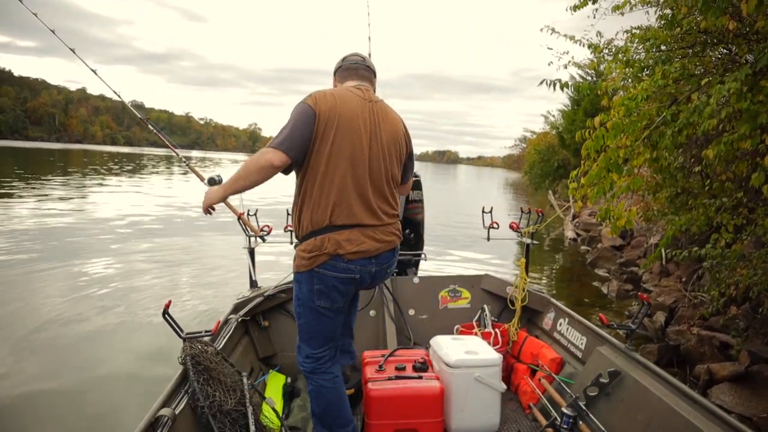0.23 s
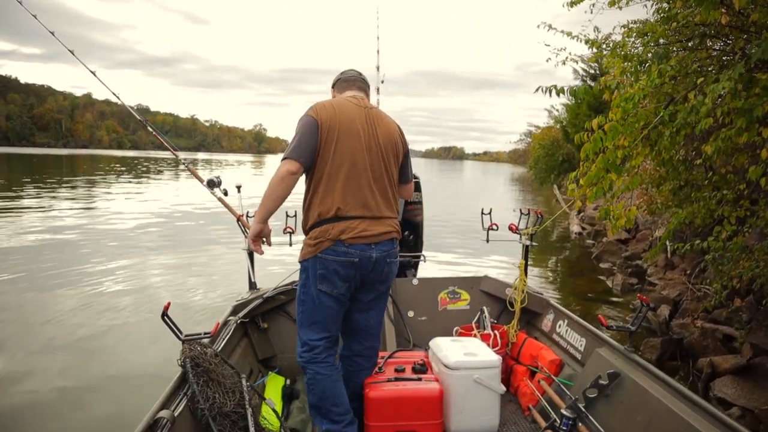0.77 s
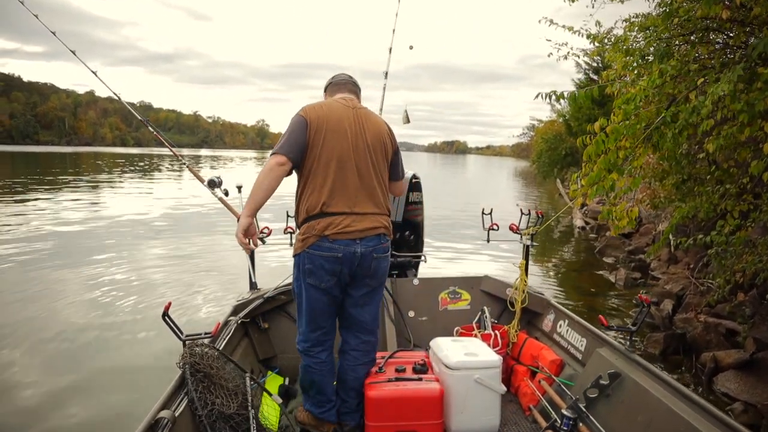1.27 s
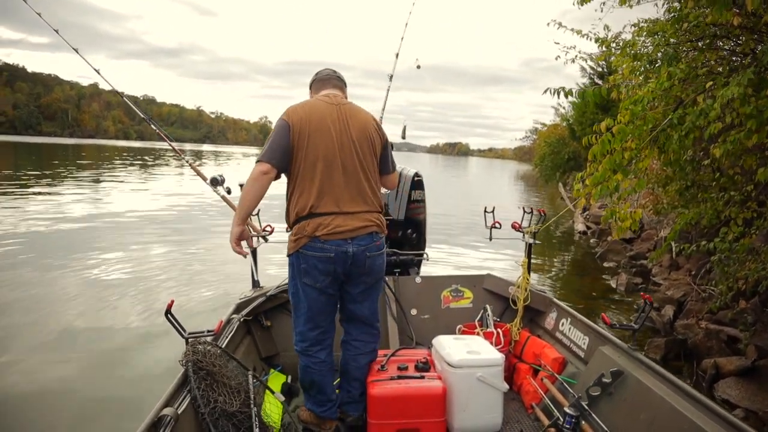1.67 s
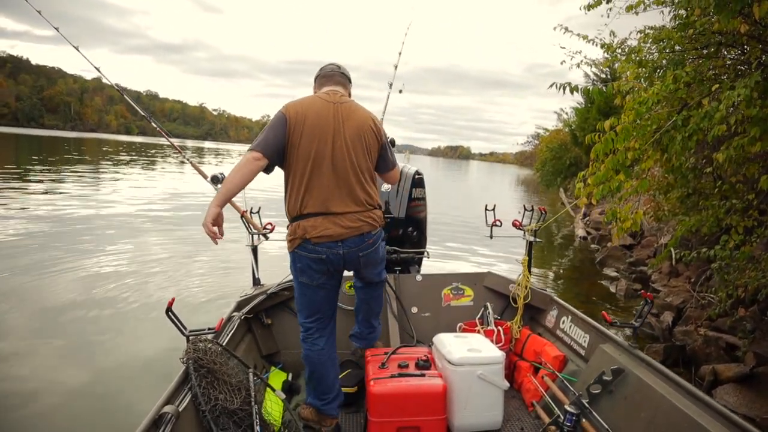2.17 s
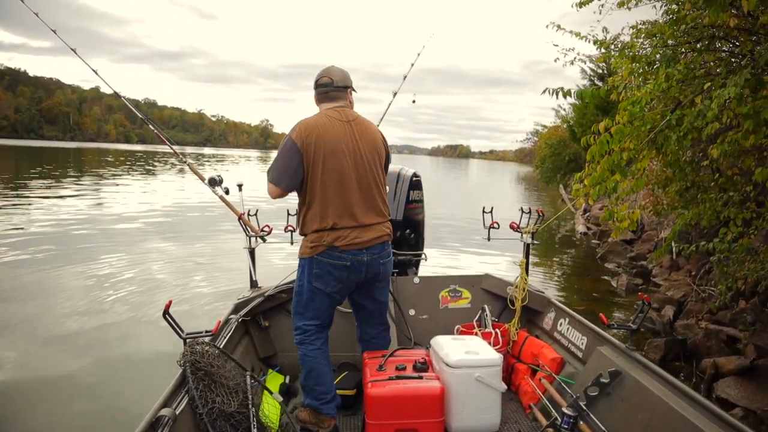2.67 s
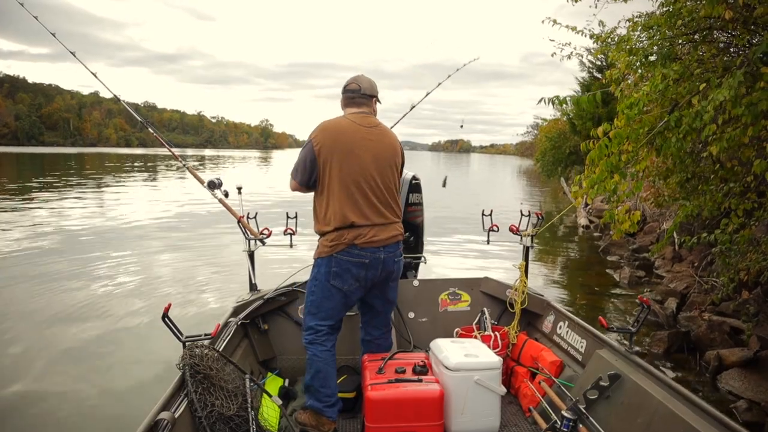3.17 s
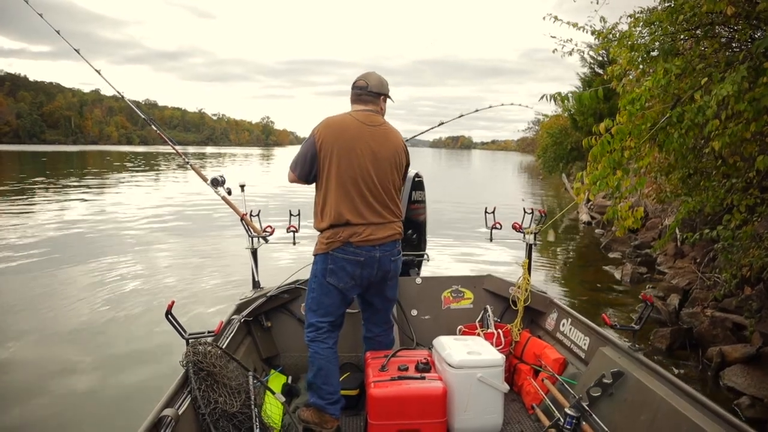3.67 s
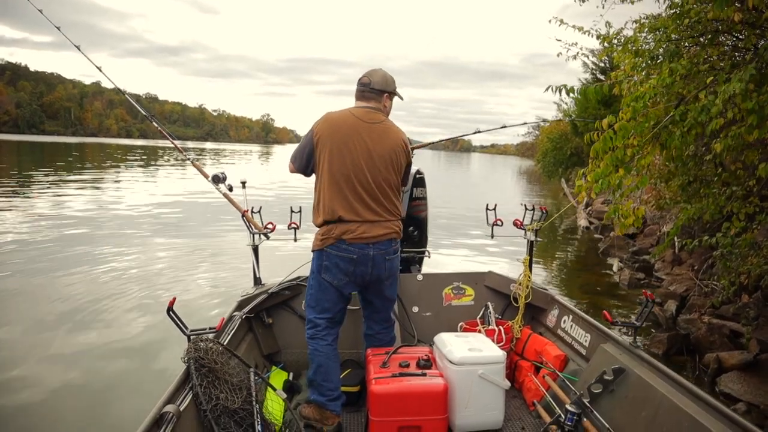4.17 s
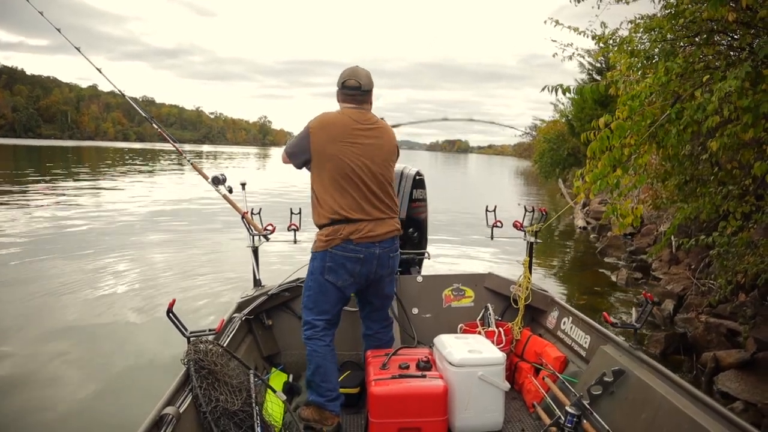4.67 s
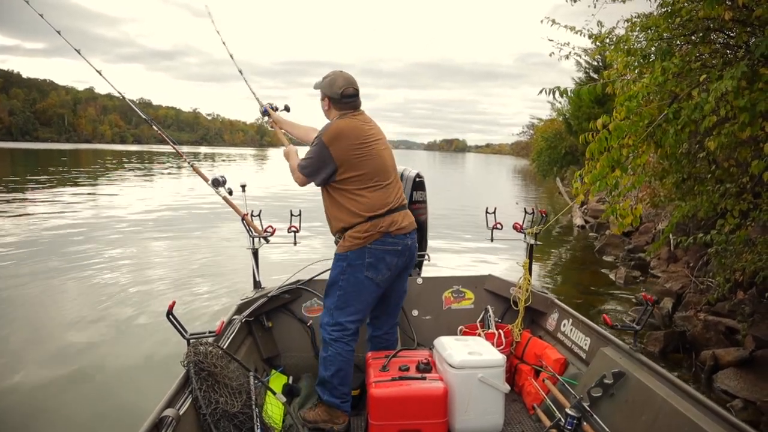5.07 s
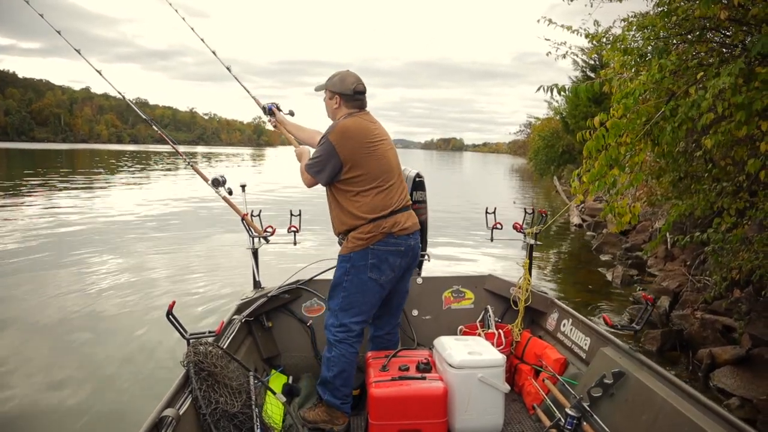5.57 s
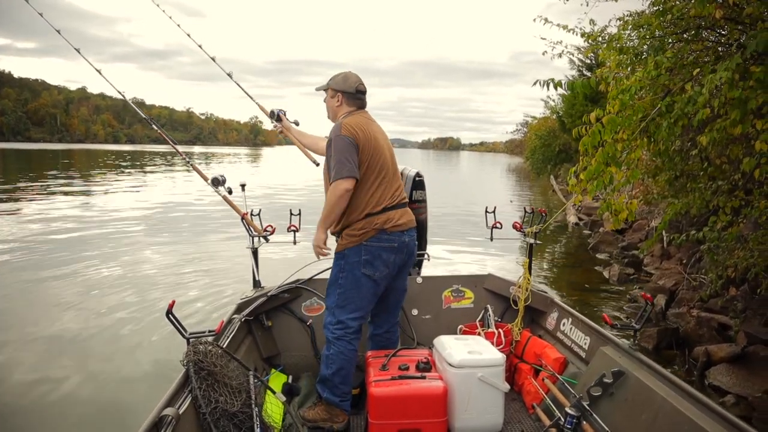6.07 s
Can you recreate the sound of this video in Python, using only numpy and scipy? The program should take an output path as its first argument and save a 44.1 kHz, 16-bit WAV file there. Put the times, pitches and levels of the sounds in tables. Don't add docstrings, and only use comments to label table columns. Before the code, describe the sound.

One microphone aboard a small metal boat hears an angler moving nearby: gritty soles, low hull booms, sharp clacks and a dominant bright bang. The movement eases, a hollow container bumps down twice, and tackle clatters. More than a second of quiet open-lake air follows. Light clicks from the rod then give way to a quick, throbbing hiss of running line that gradually weakens.

```python
import sys
import numpy as np
from scipy import signal
from scipy.fft import rfft, irfft, next_fast_len
from scipy.io import wavfile
from scipy.ndimage import uniform_filter1d

SR = 44100
rng = np.random.default_rng(int(sys.argv[2]) if len(sys.argv) > 2 else 0)


def invert_db(x):
    u = np.asarray(x, float) / 20
    return 10 ** u


def persist_wave(psi):
    counts = np.round(np.clip(psi, -1, 1) * 32767).astype(np.int16)
    wavfile.write(sys.argv[1], SR, np.atleast_2d(counts).T)


N = 278712

# pitch_hz [Hz], level_db [dB], t60_s [s]
HULL_MODES = [(57.4, -10, 0.16), (69.3, -11, 0.26), (93, -3.5, 0.25), (117.6, -9, 0.11), (131.5, -1, 0.11),
              (161, -0.5, 0.17), (187.2, -7.5, 0.33), (229, -6.5, 0.25), (266, -2, 0.11), (308, 1.5, 0.083),
              (335.3, 4, 0.094), (373, -7, 0.049), (401, -3.5, 0.13), (464, 2.5, 0.084), (526, -3.5, 0.14),
              (570, -3, 0.14), (658, -3.5, 0.11), (745.5, -6, 0.091), (854, 7.5, 0.077), (916, -9.5, 0.29),
              (1079, 7, 0.07), (1170, -4.5, 0.088), (1402, 1.5, 0.056), (1528, -7, 0.2), (1813, -1, 0.076),
              (1907, 6.5, 0.022), (2280, 4.5, 0.028), (2710, -2.5, 0.038)]


def rms_one(x):
    return x / np.sqrt(np.mean(x ** 2) + 1e-20)


def colour(x, spectrum):
    size = next_fast_len(len(x))
    hz = np.maximum(np.fft.rfftfreq(size, 1 / SR), 1)
    point_hz, point_db = np.array(spectrum).T
    level_db = np.interp(np.log(hz), np.log(point_hz), point_db, left=-90)
    return rms_one(irfft(rfft(x, size) * invert_db(level_db), size)[:len(x)])


def drift(rate_hz):
    r = np.exp(-2 * np.pi * rate_hz / SR)
    slow = signal.lfilter([1], [1, -2 * r, r * r], rng.standard_normal(N + SR))
    return rms_one(slow[SR:])


def resonate(x, hz, width_hz):
    r = np.exp(-np.pi * width_hz / SR)
    gain = (1 - r * r) / 2
    return signal.lfilter([gain, 0, -gain], [1, -2 * r * np.cos(2 * np.pi * hz / SR), r * r], x)


def grains(per_s, spread_db):
    sizes = invert_db(spread_db * np.minimum(rng.exponential(1, N), 5)) * rng.choice([-1, 1], N)
    return sizes * (rng.random(N) < per_s / SR)


def swells(starts, lengths, levels_db, rise_db_s, fall_db_s):
    t = np.arange(0, N + 64, 64) / SR
    s, length, db = (np.asarray(v, float)[:, None] for v in (starts, lengths, levels_db))
    before_s = np.maximum(s - t, 0)
    after_s = np.maximum(t - s - length, 0)
    each = db - rise_db_s * before_s - fall_db_s * after_s
    return np.interp(np.arange(N) / SR, t, each.max(axis=0))


def air():
    # pitch_hz [Hz], level_db [dB per Hz]
    far_spectrum = [(13, -51), (22, -23.5), (41, -8), (97, -4.5), (135, -6), (168, -4), (254, -7),
                    (405, -9.5), (533, -10), (595, -9), (1030, -10), (1120, -13), (1360, -12.5),
                    (3090, -29.5), (15600, -35)]
    level_db = -61 + 0.12 * drift(4.4)
    return invert_db(level_db) * colour(rng.standard_normal(N), far_spectrum)


def moving():
    # start_s [s], length_s [s], scuff_db [dB], rumble_db [dB]
    drags = [(0.0, 0.17, -62.5, -54.5), (0.213, 0.066, -62, -57.5), (0.613, 0.024, -61, -46.5),
             (0.831, 0.12, -66, -58), (1.03, 0.069, -74, -43), (1.111, 0.013, -48.5, -63),
             (1.201, 0.15, -57, -44), (1.44, 0.23, -74, -62), (1.8, 0.18, -66.5, -59),
             (1.945, 0.15, -64, -63), (2.497, 0.056, -70, -56), (2.585, 0.089, -63.5, -59),
             (2.637, 0.065, -60, -52), (2.748, 0.067, -58.5, -44), (2.83, 0.086, -64.5, -61),
             (2.95, 0.1, -66.5, -62), (3.106, 0.16, -77, -66.5), (4.462, 0.26, -76.5, -74),
             (4.753, 0.07, -72, -66.5), (4.956, 0.03, -60.5, -56), (4.999, 0.034, -54.5, -52.5),
             (5.05, 0.12, -63, -65)]
    # start_s [s], heave_db [dB], sway_db [dB]
    loads = [(0.02, -64, -64), (0.4, -88, -64), (0.64, -70, -56), (0.74, -44.5, -52), (0.86, -58, -50.5),
             (1.02, -45, -65), (1.15, -45.5, -50), (1.36, -57, -57), (1.52, -66, -54), (2.69, -62, -55),
             (2.77, -41.5, -70), (2.88, -48, -47), (3.05, -63, -52.5), (3.27, -65, -58.5), (4.76, -63, -80),
             (5.0, -71, -84)]
    # pitch_hz [Hz], level_db [dB per Hz]
    scuff_spectrum = [(530, -19), (900, -5.5), (1590, -9), (1880, -9.5), (2390, -10), (4130, -14.5),
                      (6650, -18.5), (8550, -16.5), (10300, -28), (15500, -32.5)]
    rumble_spectrum = [(90, 1), (150, 2), (300, 1.5), (550, -3), (1100, -12.5), (2000, -22.5), (4000, -77)]
    heave_spectrum = [(35, -12), (55, 2.5), (75, -18), (110, -0.5), (200, -27), (400, -87)]
    sway_hz, sway_width_hz = 27, 17

    s, length, scuff_db, rumble_db = np.transpose(drags)
    scuff_db = swells(s, length, scuff_db, rise_db_s=214, fall_db_s=175)
    rumble_db = swells(s, length, rumble_db, rise_db_s=415, fall_db_s=109.5)
    s, heave_db, sway_db = np.transpose(loads)
    heave_db = swells(s, 0 * s, heave_db, rise_db_s=171, fall_db_s=116)
    sway_db = swells(s, 0 * s, sway_db, rise_db_s=171, fall_db_s=120)

    rub = rng.standard_normal(N) * invert_db(2.16 * drift(20)) + 0.43 * grains(403, spread_db=-7.0)
    scuff = invert_db(scuff_db + 1.5) * colour(rub, scuff_spectrum)
    uneven = rng.standard_normal(N) * invert_db(3.0 * drift(18))
    rumble = invert_db(rumble_db) * colour(uneven, rumble_spectrum)
    heave = invert_db(heave_db) * colour(rng.standard_normal(N), heave_spectrum)

    swing = resonate(rng.standard_normal(N), sway_hz, sway_width_hz)
    swing = resonate(swing, sway_hz, sway_width_hz)
    steady = swing / np.sqrt(uniform_filter1d(swing ** 2, SR // 13) + 1e-14)
    sway = invert_db(uniform_filter1d(sway_db, SR // 15)) * steady
    return scuff + rumble + heave + sway


def taps():
    # start_s [s], peak_db [dB], pitch_hz [Hz], t60_s [s]
    ticking_parts = [(0.285, -52, 3000, 0.052), (0.4187, -61, 7350, 0.082), (0.52, -57.5, 8000, 0.2),
                     (0.5784, -47.5, 2620, 0.026), (0.6823, -59, 7500, 0.04), (0.82, -61, 7000, 0.029),
                     (0.8639, -61, 3450, 0.028), (0.997, -47, 2200, 0.036), (1.002, -32, 1300, 0.05),
                     (1.209, -48, 4000, 0.03), (1.2326, -50, 3000, 0.03), (1.797, -58, 2500, 0.04),
                     (1.86, -58, 2500, 0.04), (2.2039, -60, 2400, 0.04), (2.245, -62, 8000, 0.043),
                     (2.4293, -58, 4500, 0.04), (2.4867, -63, 8500, 0.06), (2.7068, -38, 1980, 0.024),
                     (2.72, -32.5, 2520, 0.03), (2.731, -53, 2800, 0.035), (2.742, -43, 1890, 0.021),
                     (2.755, -40, 1500, 0.06), (2.777, -37, 1380, 0.056), (2.823, -47, 2500, 0.02),
                     (2.8298, -34.5, 4200, 0.043), (2.875, -48, 2400, 0.04), (2.89, -50, 3000, 0.054),
                     (2.912, -46.5, 1500, 0.037), (3.003, -64, 8500, 0.02), (3.013, -59, 2470, 0.04),
                     (3.046, -70, 3970, 0.04), (3.1258, -66, 5000, 0.03), (3.19, -64, 2500, 0.03),
                     (3.213, -53, 1500, 0.032), (3.3114, -66, 2700, 0.03), (4.4762, -61, 7800, 0.08),
                     (4.56, -64, 3130, 0.27), (4.668, -67, 7500, 0.03), (4.818, -68, 7500, 0.03),
                     (4.982, -52, 2800, 0.03), (4.988, -42, 1190, 0.05), (5.009, -43.5, 4200, 0.04),
                     (5.029, -52, 3000, 0.03), (5.384, -42, 7400, 0.04), (5.386, -44, 3070, 0.04),
                     (4.767, -53, 1700, 0.027), (0.616, -48, 4300, 0.036), (2.835, -44.5, 4430, 0.05),
                     (2.8307, -35.5, 2300, 0.067), (5.053, -51, 1000, 0.028), (2.721, -47, 13500, 0.055),
                     (2.832, -60, 12500, 0.04), (4.69, -58, 524, 0.14), (4.727, -51, 460, 0.21),
                     (4.785, -49, 490, 0.078)]
    t, out = np.arange(SR // 6) / SR, np.zeros(N)
    for s, db, hz, t60 in ticking_parts:
        width_hz = 0.32 * hz
        envelope = (1 - np.exp(-t / 0.00012)) * invert_db(-60 * t / np.clip(t60, .01, .3))
        burst = rng.standard_normal(len(t)) * envelope
        burst = resonate(resonate(burst, hz, width_hz), hz, 2 * width_hz)
        at = round(s * SR)
        out[at:at + len(t)] += invert_db(db) * burst / np.abs(burst).max()
    return out


def cracks():
    # start_s [s], crack_db [dB], top_db [dB], t60_s [s]
    crushed = [(0.0735, -43.5, -73, 0.034), (0.298, -45, -53, 0.036), (0.494, -46, -61, 0.15),
               (0.595, -39.5, -76, 0.16), (0.634, -40, -71, 0.028), (0.941, -46, -63, 0.091),
               (0.9637, -34.5, -45, 0.15), (0.9834, -24, -31.5, 0.049), (0.991, -32, -55, 0.058),
               (1.081, -48, -41.5, 0.11), (1.1184, -32, -41, 0.035), (1.147, -20.5, -30, 0.075),
               (1.149, -38, -32.5, 0.068), (1.284, -44, -49, 0.14), (1.309, -41, -49.5, 0.092),
               (1.845, -66, -55.5, 0.11), (2.031, -44.5, -50.5, 0.053), (2.511, -51.5, -72, 0.062),
               (2.683, -49, -70, 0.032), (2.7083, -32, -44, 0.061), (2.725, -48, -41.5, 0.047),
               (2.773, -41, -68, 0.052), (2.829, -39, -41, 0.032), (2.836, -41, -47, 0.1),
               (2.874, -51, -74, 0.11), ]
    # start_s [s], crack_db [dB], top_db [dB]
    snaps = [(0.777, -49, -56), (0.8063, -49.5, -67), (1.4933, -56.5, -62), (2.434, -53.5, -60),
             (2.9377, -46, -47.5), (3.156, -52.5, -65), (3.2594, -63, -66), (4.475, -63, -66),
             (4.7676, -58, -73), (4.92, -42, -65), (4.9402, -43, -57), (5.0052, -46, -62),
             (5.1482, -51, -46.5), (5.2498, -44.5, -47), (5.363, -49, -58), (5.3858, -48, -53)]
    # pitch_hz [Hz], level_db [dB per Hz]
    grit_spectrum = [(1180, 11.5), (2000, 1), (3770, -1.5), (4590, -9), (6140, -13), (8960, -23.5),
                     (11200, -34.5), (15500, -37)]
    snap_t60_s = 0.055

    rough = rng.standard_normal(N + SR) * invert_db(2.3 * rng.standard_normal(N + SR))
    grit = colour(rough, grit_spectrum)
    dull, top = [signal.sosfilt(signal.butter(3, 6000, kind, fs=SR, output="sos"), grit)
                 for kind in ("low", "high")]
    top = 0.77 * top + resonate(top, 8900, 1450)
    t, out = np.arange(SR // 6) / SR, np.zeros(N + SR)
    for s, crack_db, top_db, t60 in crushed + [(*row, snap_t60_s) for row in snaps]:
        at, t60 = round(s * SR), np.clip(t60, .015, .3)
        envelope = (1 - np.exp(-t / (0.013 * t60))) * invert_db(-60 * t / t60)
        for part, db in ((dull, crack_db - 1.5), (top, top_db)):
            burst = envelope * part[at:at + len(t)]
            out[at:at + len(t)] += invert_db(db) * burst / np.abs(burst).max()
    return out[:N]


def tank():
    # start_s [s], peak_db [dB], pitch_scale [ratio]
    setdowns = [
        (2.417, -25, 1.0),
        (2.5098, -27.5, 1.04),
    ]
    # pitch_hz [Hz], level_db [dB], t60_s [s]
    tank_modes = [(108, -3.5, 0.16), (128, 0.5, 0.16), (169.8, -14, 0.51), (210.3, -9.5, 0.24),
                  (291.4, -9.5, 0.16), (401, -21.5, 0.18), (500, -19, 0.15), (561, -24, 0.23)]
    rise_s = 0.0035
    t, out = np.arange(SR // 3) / SR, np.zeros(N)
    hz, db, t60 = np.array(tank_modes).T[:, :, None]
    rise = 1 - np.exp(-(t / rise_s) ** 2)
    for s, peak_db, scale in setdowns:
        ringing = invert_db(db - 60 * t / t60) * np.sin(2 * np.pi * hz * scale * t)
        thump = -ringing.sum(axis=0) * rise
        at = round(s * SR)
        out[at:at + len(t)] += invert_db(peak_db) * thump / np.abs(thump).max()
    return out


def bows():
    # start_s [s], peak_db [dB], from_hz [Hz], to_hz [Hz], t60_s [s]
    bowing_plates = [(0.598, -19, 157, 65, 0.08), (0.94, -25, 170, 70, 0.25), (2.5, -26, 160, 71, 0.14),
                     (2.763, -25.5, 114, 95, 0.17), (1.1475, -10.5, 1002, 1130, 0.061),
                     (1.146, -19, 1930, 1970, 0.04), (0.604, -28, 78, 63, 0.25),
                     (1.157, -11.5, 494, 510, 0.078), (1.203, -28.5, 440, 460, 0.054),
                     (2.784, -23.5, 396, 430, 0.041), (0.597, -40.5, 790, 760, 0.17),
                     (0.6, -41, 730, 675, 0.21), (0.77, -39, 74, 64, 0.23), (0.73, -38, 91, 68, 0.34),
                     (1.02, -27.5, 125, 69, 0.12), (1.17, -31.5, 130, 92, 0.16),
                     (0.55, -40, 185, 160, 0.11), (0.986, -27.5, 750, 990, 0.046),
                     (1.174, -26, 510, 460, 0.048), (2.145, -63, 230, 220, 0.18),
                     (2.275, -57, 215, 215, 0.17), (2.32, -51.5, 215, 220, 0.13),
                     (2.35, -56, 170, 131, 0.18)]
    sink_s, rise_s = 0.019, 0.0016
    t, out = np.arange(SR // 2) / SR, np.zeros(N)
    for s, db, from_hz, to_hz, t60 in bowing_plates:
        cycles = to_hz * t + (from_hz - to_hz) * sink_s * (1 - np.exp(-t / sink_s))
        note = np.sin(2 * np.pi * cycles) * (1 - np.exp(-t / rise_s)) * invert_db(db - 60 * t / t60)
        at = round(s * SR)
        out[at:at + len(t)] += note
    return out


def strike(s, peak_db, centre_hz, share, chance, low_hz, high_hz, lead_db, onset, slope_db, scatter, stretch):
    hz, mode_db, t60 = np.array([m for m in HULL_MODES if low_hz <= m[0] < high_hz]).T[:, :, None]
    nearest = np.argmin(np.abs(hz - centre_hz))
    hz[nearest] = centre_hz
    strength, phase = chance[:, :len(hz), None]
    t = np.arange(int(min(1.2 * t60.max() + 0.069, .45) * SR)) / SR
    near_db = -slope_db * np.abs(np.log2(hz / centre_hz)) - lead_db * (hz != centre_hz)
    rise = 1 - np.exp(-t * hz * onset)
    struck_panel = invert_db(-60 * t / (t60 * np.clip(share, .15, 2)))
    whole_hull = invert_db(-27.5 - 60 * t / (3.3 * t60))
    bent = t + stretch * 0.014 * (1 - np.exp(-t / 0.018))
    waves = np.sin(2 * np.pi * hz * bent + scatter * phase)
    level = invert_db(mode_db + near_db + 2.0 * strength)
    blow = (level * rise * (struck_panel + whole_hull) * waves).sum(axis=0)
    fade_out = np.minimum(1, 8 * (1 - t / t[-1]))
    return round(s * SR), invert_db(peak_db) * blow / np.abs(blow).max() * fade_out


def knocks():
    # start_s [s], peak_db [dB], panel_hz [Hz], ring_share [of the free decay]
    heel_booms = [(0.494, -44.5, 155, 0.3), (0.649, -30.5, 240.7, 0.48), (0.617, -24, 174.3, 0.5),
                  (0.676, -32, 149, 0.41), (0.703, -48, 69, 0.74), (0.757, -44, 75, 0.69),
                  (0.966, -21, 145.8, 0.54), (0.994, -22, 171, 0.26), (1.011, -28, 104.5, 0.38),
                  (1.03, -33, 110, 0.34), (1.074, -29, 138, 0.51), (1.15, -26.5, 167, 0.5),
                  (1.236, -43, 191.4, 1.7), (2.079, -45, 141, 0.66), (0.705, -40.5, 232, 1.9),
                  (0.925, -42, 65.6, 0.28), (2.621, -46.5, 128, 1.2), (2.728, -30, 91, 0.45),
                  (2.802, -34, 109, 0.38), (2.828, -33.5, 83, 0.76), (2.874, -37.5, 71.6, 0.37),
                  (2.93, -43.5, 72, 1.3), (4.949, -44.5, 114, 0.74), (5.011, -47, 74.4, 1.1), ]
    boot_knocks = [(0.28, -45.5, 334, 1), (0.302, -45, 393, 0.58), (0.494, -29, 442, 0.41),
                   (0.596, -20.5, 295, 0.22), (0.617, -25.5, 250, 1), (0.612, -32.5, 451, 1),
                   (0.963, -23, 583, 0.17), (0.984, -30, 297, 0.6), (1.049, -34.5, 256, 0.78),
                   (1.115, -35, 360, 0.63), (1.1465, -10, 448, 0.28), (1.149, -13.5, 341, 0.28),
                   (1.204, -40, 465, 0.38), (1.156, -25, 500, 0.4), (1.352, -50, 470, 0.7),
                   (1.946, -40, 324, 0.2), (2.087, -43, 550, 0.45), (2.766, -41, 295, 0.59),
                   (2.794, -50, 343, 0.37), (1.186, -26, 466, 0.54), (2.708, -28.5, 347, 0.47),
                   (2.7155, -23.5, 433, 0.49), (2.754, -32, 484, 1), (2.79, -34.5, 396, 0.54),
                   (2.826, -34.5, 370, 0.43), ]
    edge_clacks = [(0.218, -43, 1180, 0.25), (0.28, -45, 956, 0.7), (0.302, -41, 780, 0.19),
                   (0.494, -40, 835, 0.14), (0.596, -30.5, 1045, 1.6), (0.599, -32, 1970, 0.32),
                   (0.94, -44, 1433, 1.2), (0.963, -22, 875, 0.16), (0.987, -24, 2130, 0.47),
                   (1.010, -31, 1517, 0.27), (1.072, -34.5, 857, 0.36), (1.1462, -12, 855, 0.55),
                   (1.352, -30.5, 953, 0.34), (1.946, -48.5, 1750, 0.54), (2.03, -54, 1180, 0.58),
                   (2.708, -26, 1355, 0.85), (2.712, -30.5, 2580, 1), (2.826, -43, 1370, 0.33),
                   (2.875, -62, 1350, 0.56), (2.895, -48, 1480, 0.16), (3.156, -51.5, 1251, 0.32)]
    # start_s [s], knock_db [dB], knock_hz [Hz], clack_db [dB], clack_hz [Hz]
    jolts = [(4.7, -49, 348, -61, 840), (4.768, -52, 550, -50, 1345), (4.921, -40.5, 432, -39, 905),
             (4.941, -36, 450, -35, 904), (5.015, -37, 516, -56, 740), (5.069, -42, 370, -51, 815),
             (5.131, -46, 540, -44, 1000), (5.149, -48.5, 325, -48, 1170)]
    mode_ranges = [
        (50, 250, 5, 1.55, 7, 0.71, 0.18),
        (250, 840, 3, 1.16, 12.5, 1.39, 0.0085),
        (747.4, 3100, 5, 0.58, 1.5, 3.32, 0.0018),
    ]

    middle, high = list(boot_knocks), list(edge_clacks)
    for s, knock_db, knock_hz, clack_db, clack_hz in jolts:
        share = 0.33 - 0.025 * (clack_db + 40)
        middle.append((s, knock_db, knock_hz, share))
        high.append((s, clack_db, clack_hz, share))
    out = np.zeros(N + SR)
    for rows, modes in zip((heel_booms, middle, high), mode_ranges):
        for row in rows:
            chance = rng.standard_normal((2, len(HULL_MODES)))
            at, blow = strike(*row, chance, *modes)
            out[at:at + len(blow)] += blow
    return out[:N]


def spool():
    release_s, run_up_s = 5.122, 0.055
    thumb_s, grip_s = 6.06, 0.021
    ease_s, ease_over_s = 6.17, 0.016
    now = np.arange(N) / SR
    t = now - release_s
    run_up_db = 20 * np.log10(1e-4 + 1 - np.exp(-np.maximum(t, 0) / run_up_s))
    braked = np.clip((now - thumb_s) / grip_s, 0, 1)
    eased = np.clip((now - ease_s) / ease_over_s, 0, 1)
    hiss_db = -52.5 + run_up_db - 5 * t - 3.5 * braked + 3.5 * eased
    top_db = -71.5 + .5 * run_up_db + 2 * t - 7 * braked
    return hiss_db, top_db


def wander(x, hz, width_hz):
    centre_hz = hz * (1 + 0.007 * drift(3)[:len(x)])
    turn = np.exp(2j * np.pi * np.cumsum(centre_hz) / SR)
    r = np.exp(-np.pi * width_hz / SR)
    return 2 * np.real(turn * signal.lfilter([1 - r], [1, -r], x / turn))


def reel():
    # time_s [s], turns_per_s [1/s]
    spool_turns = [(5.12, 32), (5.4, 39), (5.6, 33), (5.9, 27), (6.05, 24), (6.32, 22)]
    # pitch_hz [Hz], width_hz [Hz], level_db [dB]
    body_modes = [(1170, 62, -0.5), (1500, 80, 3.5), (2460, 65, -33), (2950, 67, 7), (3220, 42, -5.5),
                  (4140, 70, 8), (4880, 55, 6.5), (5320, 170, 8.5), (5950, 50, 3), (6280, 90, 3),
                  (7330, 340, -3.5), (8100, 650, 0.5)]
    # pitch_hz [Hz], level_db [dB per Hz]
    line_spectrum = [(530, -11), (900, -1.5), (1160, -0.5), (1370, -7.5), (2290, -5.5), (2940, -4),
                     (3530, -7), (5440, 1), (6890, -8), (8120, -11), (10500, -37), (13600, -50),
                     (22000, -120)]
    lip_spectrum = [(6180, -27), (9500, -16), (11500, 2), (13500, 4), (15600, 0)]
    # start_s [s], peak_db [dB]
    guide_slaps = [(5.1423, -52), (5.247, -54), (5.3618, -55), (5.47, -56), (5.5945, -57), (5.7244, -61),
                   (5.8307, -63), (5.8621, -61), (5.9609, -50), (6.0452, -59)]

    hiss_db, top_db = spool()
    time_s, turns_per_s = np.transpose(spool_turns)
    turns = np.interp(np.arange(N) / SR, time_s, turns_per_s, left=0, right=0)
    angle = 2 * np.pi * np.cumsum(turns * (1 + 0.022 * drift(3.4))) / SR
    throb_db = 1.1 * np.sin(angle) + 1.1 * np.sin(3 * angle) + 1.3 * drift(60)
    rub = invert_db(throb_db) * (rng.standard_normal(N) + 2.0 * grains(3000, spread_db=2.0))

    start, body = 5 * SR, np.zeros(N)
    for k, (hz, width_hz, db) in enumerate(body_modes):
        level = (-1) ** k * invert_db(db + 2.0 * drift(6)[start:])
        body[start:] += level * wander(rub[start:], hz, 0.6 * width_hz)
    body[:start] = np.resize(body[start:], start)
    hiss = rms_one(rms_one(body) + invert_db(1.0) * colour(rub, line_spectrum))

    slaps = np.full(N, 1e-18)
    for s, db in guide_slaps:
        slaps[round(s * SR)] = invert_db(db + 22.0)
    slaps = resonate(resonate(slaps, 13700, 1800), 14200, 5000)
    return invert_db(hiss_db + 2.5) * hiss + invert_db(top_db) * colour(rub, lip_spectrum) + slaps


def scene():
    hull_low_hz = 50.6
    low_cut = signal.butter(2, hull_low_hz, "high", fs=SR, output="sos")
    blows = signal.sosfilt(low_cut, knocks() + tank() + bows())
    return (blows + cracks() + moving() + reel() + air() + taps())[None, :]


def roll_off(x):
    return signal.sosfilt(signal.butter(12, 15730, fs=SR, output="sos"), x)


def record(dry):
    top_cut = signal.ellip(8, .3, 50, 15750, fs=SR, output="sos")
    mix = signal.sosfilt(top_cut, dry)
    return roll_off(mix)


dry = scene()
out = record(dry)
persist_wave(out)
```